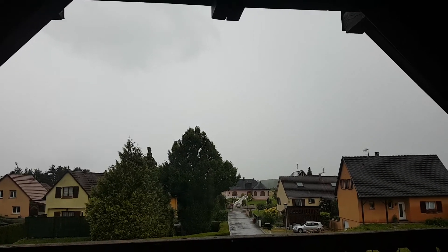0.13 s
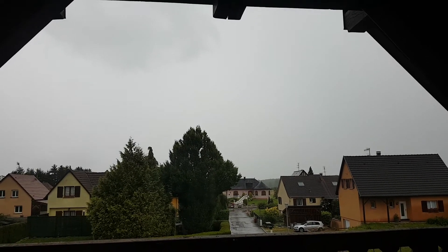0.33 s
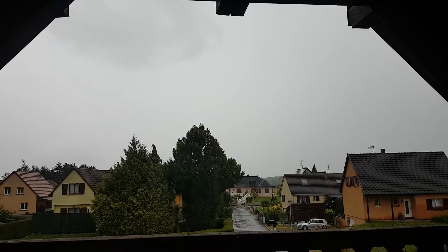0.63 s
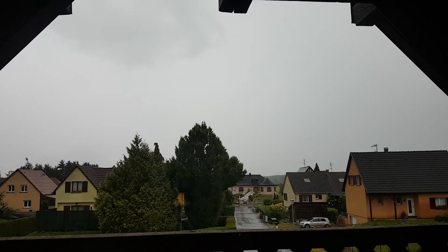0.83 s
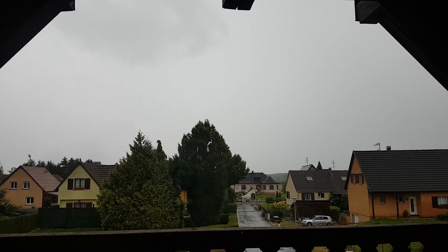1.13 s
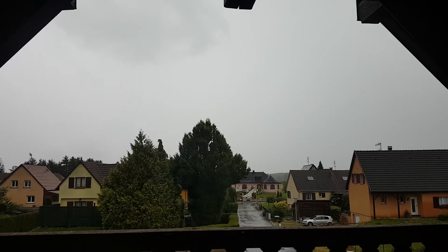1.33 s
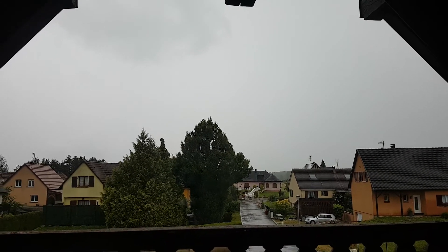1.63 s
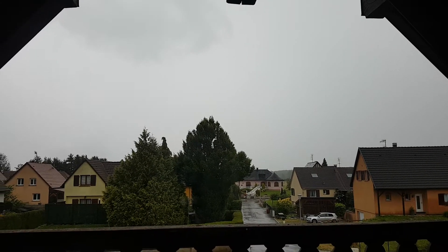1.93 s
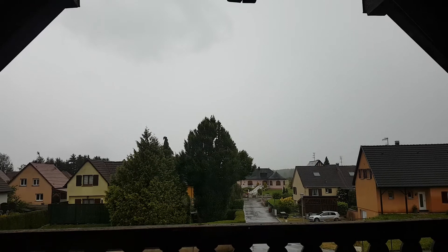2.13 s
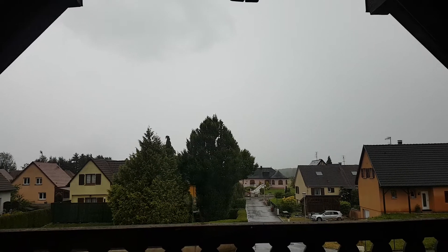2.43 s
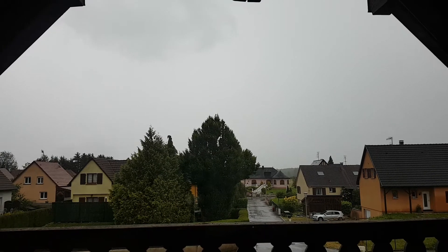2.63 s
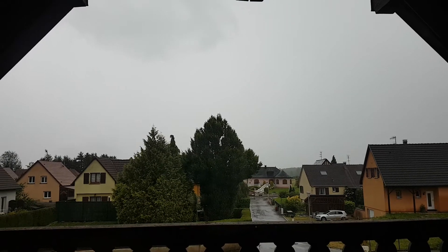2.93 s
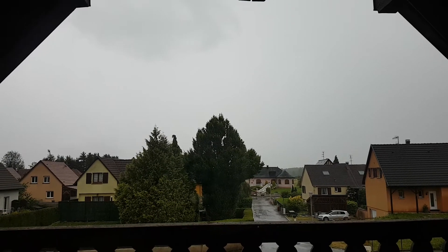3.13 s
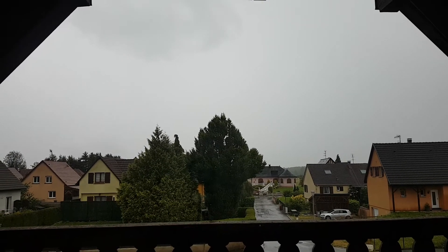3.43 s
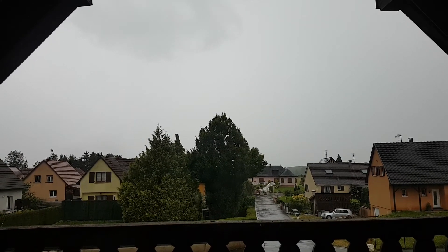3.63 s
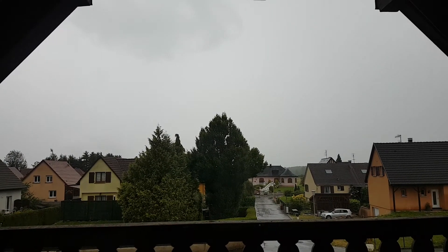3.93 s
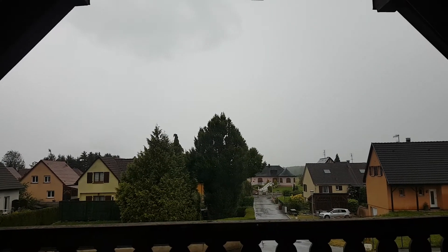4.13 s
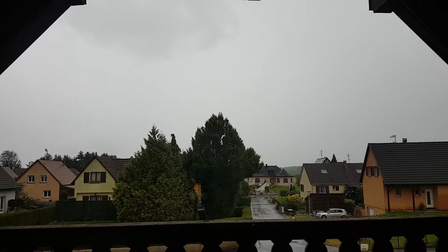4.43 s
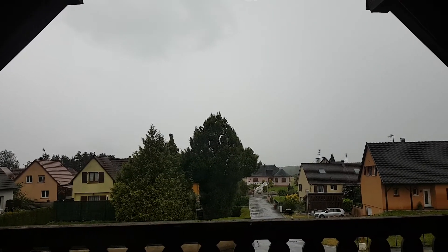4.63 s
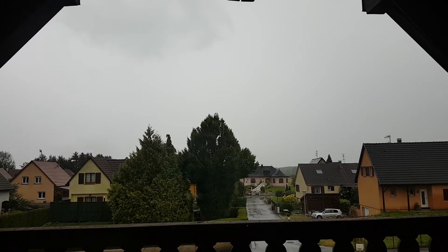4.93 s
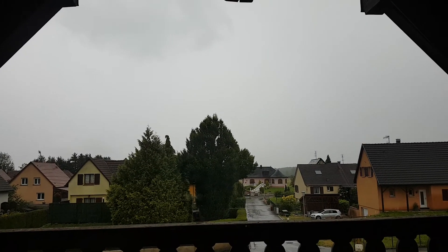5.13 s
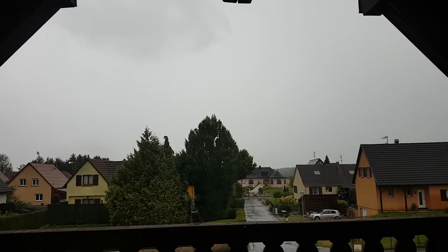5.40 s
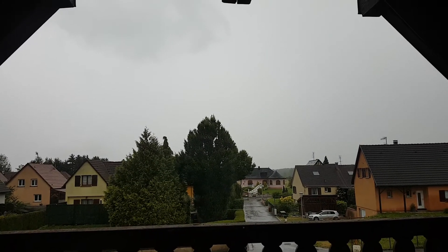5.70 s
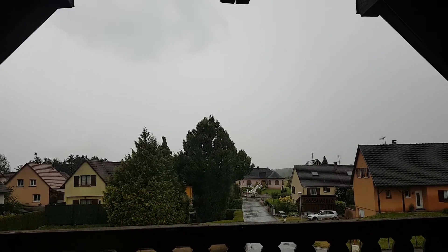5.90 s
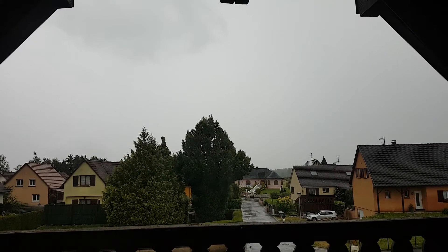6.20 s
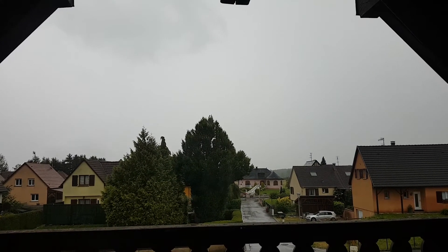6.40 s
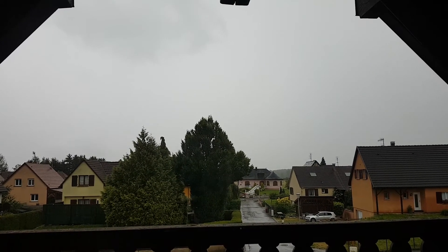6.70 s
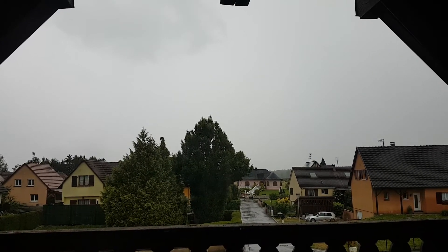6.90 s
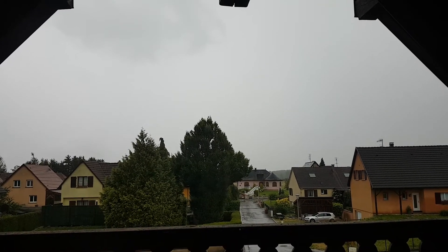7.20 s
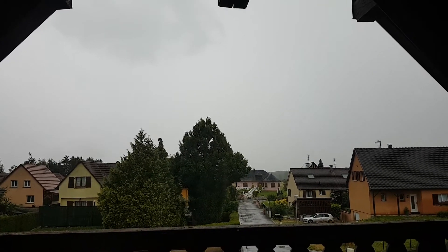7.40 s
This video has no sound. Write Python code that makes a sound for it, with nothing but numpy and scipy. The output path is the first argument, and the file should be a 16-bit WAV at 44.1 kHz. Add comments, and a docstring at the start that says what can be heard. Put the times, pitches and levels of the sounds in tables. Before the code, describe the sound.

Over a soft hiss of rain, nearby thunder tears open, booms in several waves and rolls away.

```python
"""Thunder from a near lightning strike, heard from a roofed wooden balcony above a village in light rain.
Shock waves from the kinks of the lightning channel arrive one after another: a tearing crackle,
heavy claps, then a dull roll that fades. The air dulls them and the balcony rings along.
Rain hisses far off, and two drops land on wood close by."""
import sys
import numpy as np
from scipy import signal
from scipy.fft import rfft, irfft, next_fast_len
from scipy.io import wavfile
from scipy.ndimage import uniform_filter1d

SR = 44100
rng = np.random.default_rng(int(sys.argv[2]) if len(sys.argv) > 2 else 0)


def store_pcm(level_fs):
    """Save levels as 16-bit WAV."""
    pcm = np.round(np.clip(level_fs, -1, 1) * 32767).astype(np.int16)
    wavfile.write(sys.argv[1], SR, np.atleast_2d(pcm).T)


N = 332999

# The tone of the rain. Each row: frequency in Hz, gain in dB.
RAIN_TONE = [(40, 2), (100, 1.5), (280, -3), (400, -3), (900, -7.5), (2000, -6.5), (3200, -14), (4700, -18),
             (5800, -22), (7400, -21), (8700, -29.5), (10500, -28.5), (12500, -25), (15500, -22)]
# How loud the rain is. Each row: time in seconds, level in dB.
RAIN_LEVELS = [(0, -63), (.7, -62), (1.5, -58), (2.1, -59.5), (3, -60.5), (4.5, -59.5), (6.2, -59.5),
               (6.52, -59), (6.7, -59.5), (7.55, -60)]
# Drops landing close by. Each row: start in seconds, peak in dB, brightness in dB per octave,
# pitch of the struck spot as a factor.
NEAR_DROPS = [(1.079, -28.5, 2.2, 1), (3.7664, -34.5, -2, .74)]
# The tone of a splat, before its pitch factor. Each row: frequency in Hz, gain in dB.
SPLAT_TONE = [(800, -30), (1900, -3), (2700, 3), (3400, -2.5), (4800, 0), (5900, -4.5), (6800, -19),
              (9000, -21), (10800, -9), (13500, -17), (15500, -15)]
# Where wood rings, before the pitch factor. Each row: frequency in Hz, width in Hz, gain in dB.
WOOD_RESONANCES = [(2860, 350, 8), (3950, 250, 4.5), (4800, 540, 8.5)]
# The tone of shocks after crossing the air. Each row: frequency in Hz, gain in dB.
AIR_TONE = [(25, -8.5), (45, -16), (120, -4.5), (400, -10), (700, -13), (1100, -19), (1500, -19),
            (2000, -36), (2600, -49), (3500, -73.5), (6000, -95)]
# Where the space under the roof rings. Each row: frequency in Hz, width in Hz, gain in dB.
BALCONY_RESONANCES = [(62.5, 2.7, 12), (72.5, 17, -5), (97.3, 28, 8), (116, 6.6, -7.5), (148.8, 37, 8),
                      (194, 12, 3.5), (220.4, 22, 7), (262.7, 10.7, 13), (289, 36, -8.5), (326, 42, 5.5),
                      (369.4, 23.5, 10), (408.4, 9.1, 7), (460.4, 15, 8.5), (500.3, 24, 3), (539, 24, 5.5),
                      (645.5, 37, 6), (695, 22, -2), (878.4, 36, 8), (998, 11, 6), (1166, 74, 1.5),
                      (1280, 21, 3), (1582, 70, 3), (1855, 31, 6.5), (2060, 48, 8.5), (2920, 490, 4.5)]
# How two microphone openings hear a sound. Each row: frequency in Hz, likeness (1 or more is alike),
# lead of the left side in radians, left level over right in dB.
MIC_PORTS = [(50, 1.05, 0.67, 0.5), (154, 1.02, 0.35, 0), (264, 0.87, 0.48, -2), (397, 0.88, -0.9, -2.5),
             (470, 0.94, 0, -1.5), (703, 0, -1.46, -4.5), (784, 0.99, -1.33, -6.5), (863, 0.7, -2.5, 4.5),
             (970, 0.64, -2.5, -3.5), (1520, 0.62, -3, 0), (1910, 0, -3.5, 2), (3130, 0, -6.5, -3.5),
             (15000, 0, -12, 0)]
# The roll under the claps, before each band's own gain. Each row: time in seconds, level in dB,
# extra bass in dB, extra crackle in dB.
ROLL_LEVELS = [(0,-76,4,3), (.62,-63,-7,-9), (.96,-45,-12.5,-8), (1.22,-48,-8,-10), (1.6,-42.5,-9.5,-8),
               (2.0,-35,-6.5,-13.5), (2.12,-28,-2.5,-13.5), (2.5,-34,5,-14.5), (2.81,-23.5,3.5,-16),
               (3.03,-30,1.5,-20), (3.58,-39,2,-22), (3.78,-35.5,-0.5,-18.5), (4.06,-35.5,.5,-27),
               (4.26,-27.5,3.5,-26.5), (4.65,-32.5,2,-24.5), (4.9,-29,2.5,-28.5), (5.64,-30,2.5,-24.5),
               (5.98,-37,4,-20.5), (6.22,-37.5,3,-20.5), (6.53,-45.5,4.5,-19), (6.83,-44.5,5.5,-16),
               (7.0,-52.5,6.5,-15), (7.55,-55,5.5,-17)]
# Sharp cracks, loudest on the nearest claps. Each row: start in seconds, level in dB,
# length in seconds, main pitch in Hz.
SHARP_CRACKS = [(0.474, -60, 0.02, 700), (0.701, -62, 0.05, 1200), (0.819, -54, 0.037, 1000),
                (0.917, -55, 0.079, 1020), (1.491, -53, 0.077, 1190), (1.787, -48.5, 0.076, 1210),
                (1.941, -50, 0.045, 1300), (2.053, -39.5, 0.043, 2200), (2.097, -38.5, 0.065, 1514),
                (2.24, -46, 0.18, 1480), (2.594, -34.5, .018, 3600), (2.597, -35.5, 0.046, 1674),
                (2.759, -40.5, 0.093, 1000), (5.647, -48.5, .04, 805), (6.5, -58, .06, 2300)]
# The tone all cracks share. Each row: frequency in Hz, gain in dB.
SHARP_TONE = [(300, -25), (900, 3.5), (2000, -2), (3000, -22.5), (4200, -38.5), (6000, -48.5),
              (9000, -59.5)]
# Heavy claps. Each row: start in seconds, level in dB, length in seconds, main pitch in Hz,
# focus on that pitch (1 is ragged, over 10 is round), extra level of its thump in dB.
HEAVY_CLAPS = [(1.75,-33,0.017,430,19,-33), (1.8,-34,0.031,419,23,-25), (1.846,-31,0.014,427,21,-25),
               (1.947,-29,0.029,456,27,-39.5), (2.044,-22.5,0.11,445,5,-9), (2.222,-31.5,0.11,490,5.4,-14),
               (2.342,-24,0.066,444,6.8,-16), (2.541,-26.5,0.049,500,4,-5.5),
               (2.592,-16,0.059,320,1.66,-14), (2.672,-21.5,0.021,230,8.2,-27), (2.725,-27,.05,200,6,-13.5),
               (2.78,-17.5,0.088,253,1.8,-3), (2.886,-19.5,0.02,250,0.92,-12),
               (2.968,-30.5,.036,275,2.7,-17), (3.096,-20,0.023,135,3.5,-11), (3.118,-21,0.06,331,4.7,-9),
               (3.25,-27.5,0.066,480,1.7,-6), (3.326,-25,0.099,307,0.87,-18),
               (3.898,-32.5,0.095,383,1.2,-1), (4.17,-27.5,0.13,340,3,-16), (4.25,-25,0.044,330,1.9,-19),
               (4.265,-29.5,0.15,197,34,-20), (4.41,-30.5,0.02,313,2.2,-10), (4.75,-30,.12,640,2.9,-12),
               (4.968,-27.5,0.028,217,4.2,-12), (5.061,-24.5,0.063,146,4.2,-1), (5.239,-34,0.075,195,3.3,8),
               (5.343,-29.5,0.037,410,2.1,-18), (5.464,-37.5,0.053,285,1.1,3),
               (5.542,-23.5,0.022,255,1.15,-6), (5.627,-18,0.037,153,4.8,-20), (5.657,-20,0.045,253,44,-25),
               (5.789,-27,0.034,200,2.7,-30), (5.871,-26,0.02,265,1.34,-11), (6.018,-32.5,0.1,324,3,-2.5),
               (6.137,-25.5,0.06,190,4.3,-16), (6.281,-39.5,0.08,380,3.6,-14)]


def gain_of(db):
    """Turns decibels into a factor."""
    return 10 ** (np.asarray(db) / 20)


def unit_level(x):
    """Scales a sound to an average power of 1."""
    return x / np.sqrt(np.mean(x ** 2) + 1e-20)


def at_hz(table, hz):
    """Looks up a table's columns at these frequencies."""
    row_hz, *columns = np.transpose(table)
    return np.squeeze([np.interp(np.log(hz + 1), np.log(row_hz + 1), c) for c in columns])


def over_time(table):
    """Draws straight lines between a table's rows, one value per sample."""
    times, *columns = np.transpose(table)
    return np.squeeze([np.interp(np.arange(N) / SR, times, c) for c in columns])


def add(mix, start_s, sound):
    """Mixes a sound in at its start time."""
    part = mix[:, round(start_s * SR):][:, :sound.shape[1]]
    part += sound[:, :part.shape[1]]


def colour(x, db_at, size=16384):
    """Shapes the tone by db_at(Hz); it rings only after each hit, never before."""
    hz = abs(np.fft.fftfreq(size, 1 / SR))
    log_gain = np.log(gain_of(np.maximum(db_at(hz), -120)))
    response = np.fft.ifft(np.exp(np.conj(signal.hilbert(log_gain)))).real[:size // 2]
    return signal.fftconvolve(x, response[None], axes=1)[:, :x.shape[1]]


def band(x, low_hz, high_hz):
    """Keeps what lies between two frequencies."""
    return signal.sosfiltfilt(signal.butter(3, [low_hz, high_hz], "band", fs=SR, output="sos"), x)


def swell(x, level_db, smooth_s=0.021):
    """Makes a sound follow a level curve, keeping its fast flutter."""
    span = int(smooth_s * SR)
    power = uniform_filter1d(uniform_filter1d((x ** 2).mean(0), span), span)
    return x * gain_of(level_db) / np.sqrt(abs(power) + 1e-20)


def resonances_db(table, hz):
    """Each resonance lifts or lowers the frequencies near its own."""
    return sum(db / (1 + (2 * (hz - centre) / width) ** 2) for centre, width, db in table)


def stereo(pair):
    """Turns two unrelated signals into what the left and right microphone openings hear."""
    size = next_fast_len(pair.shape[1] + 2048)
    shared, separate = rfft(pair, size)
    likeness, lead, balance_db = at_hz(MIC_PORTS, np.fft.rfftfreq(size, 1 / SR))
    likeness = np.clip(likeness, 0, 1)
    left = (likeness * shared + np.sqrt(1 - likeness ** 2) * separate) * np.exp(1j * lead)
    lean = gain_of(balance_db / 2)
    return irfft([left * lean, shared / lean], size)[:, :pair.shape[1]]


def shocks(count, per_s, spread_db):
    """Two streams of randomly timed pressure jumps; spread_db makes their sizes uneven."""
    height = gain_of(spread_db * np.minimum(rng.exponential(1, (2, count)), 3.5))
    return height * rng.choice([-1, 1], (2, count)) * (rng.random((2, count)) < per_s / SR)


def rain():
    """Far drops merge into a hiss; nearer ones patter faintly."""
    hiss = unit_level(rng.standard_normal((2, N)))
    patter = gain_of(-9) * unit_level(shocks(N, per_s=280, spread_db=0))
    drops = stereo(colour(hiss + patter, lambda hz: at_hz(RAIN_TONE, hz)))
    return gain_of(over_time(RAIN_LEVELS)) * unit_level(drops)


def drips(splat_fade_s=0.011, echo_db=-15, echo_fade_s=0.14):
    """A drop splats on the wood, which rings briefly; the roof gives a short echo."""
    out, t = np.zeros((2, N)), np.arange(SR // 4) / SR
    for start_s, peak_db, bright_db, pitch in NEAR_DROPS:
        splat, echo = rng.standard_normal((2, 2, len(t)))
        splat *= gain_of(-60 * t / splat_fade_s)
        echo = band(echo, 2400 * pitch, 6500 * pitch) * gain_of(echo_db - 60 * t / echo_fade_s)
        tick = colour(splat + echo, lambda hz: at_hz(SPLAT_TONE, hz / pitch)
                      + resonances_db(WOOD_RESONANCES, hz / pitch)
                      + bright_db * np.log2(1 + hz / 1000))
        add(out, start_s, gain_of(peak_db) * tick / abs(tick).max())
    return out


def path_db(hz):
    """Air takes away the treble; the balcony adds its ringing."""
    return at_hz(AIR_TONE, hz) + resonances_db(BALCONY_RESONANCES, hz)


def thumps_db(rise_s=0.034, linger_s=0.03):
    """Level curve of the deep thumps: each rises quickly and outlasts its clap a little."""
    power, age = np.zeros((1, N)), np.arange(SR // 2) / SR
    for start_s, level_db, length_s, _, _, thump_db in HEAVY_CLAPS:
        shape = np.minimum(age / rise_s, 1) * np.exp(-(age / (length_s + linger_s)) ** 4)
        add(power, start_s, (gain_of(level_db + thump_db) * shape[None]) ** 2)
    return 10 * np.log10(power[0] + 1e-20)


def roll():
    """A dense stream of shocks: short waves from near parts of the channel, long ones from afar."""
    level_db, bass_db, crackle_db = over_time(ROLL_LEVELS)
    depth_db = -16 + 0.9 * np.arange(N) / SR  # later sound comes from farther off, so it is deeper
    stream = stereo(colour(shocks(N, per_s=2400, spread_db=2), path_db))
    rumble = swell(band(stream, 25, 104), level_db + bass_db + depth_db, smooth_s=0.23)
    # The thumps sit on the balcony's lowest resonance.
    thumps = gain_of(-4) * swell(band(stream, 52, 74), thumps_db(), smooth_s=0.041)
    boom = gain_of(-4) * swell(band(stream, 116, 306), level_db + bass_db)
    body = gain_of(-1) * swell(band(stream, 321, 1133), level_db, smooth_s=0.067)
    crackle = gain_of(3.5) * swell(band(stream, 963, 6000), level_db + crackle_db)
    return rumble + thumps + boom + body + crackle


def hump_db(hz, centre_hz, focus=1):
    """A burst's tone is a hump: lower for longer waves, narrower for waves of like length."""
    ratio = (hz + 1) / centre_hz
    return focus * 20 * np.log10(2 * ratio / (1 + ratio ** 2))


def burst(start_s, level_db, length_s, db_at, per_s, rise_share, echo_db, echo_fade_s):
    """A tight bunch of shocks and their echoes off the houses; returns (start, sound)."""
    lead_s = 0.04
    t = np.arange(SR // 3) / SR - lead_s
    direct = np.exp(-(t / length_s) ** 4) * shocks(len(t), per_s, spread_db=1.5)
    echoes = gain_of(echo_db - 60 * abs(t) / echo_fade_s) * shocks(len(t), per_s=440, spread_db=-0.5)
    rise = np.sqrt(np.clip(t / (rise_share * length_s), 0, 1))
    sound = colour((direct + echoes) * rise, db_at)
    sound /= np.sqrt((sound ** 2).sum(1, keepdims=True) / (length_s * SR))
    soft_edges = signal.windows.tukey(len(t), lead_s)
    return start_s - lead_s, gain_of(level_db) * stereo(sound) * soft_edges


def cracks():
    """Fewer, brighter shocks are heard as tearing."""
    out = np.zeros((2, N))
    for start_s, level_db, length_s, pitch_hz in SHARP_CRACKS:
        tone_db = lambda hz: at_hz(SHARP_TONE, hz) + hump_db(hz, pitch_hz)
        add(out, *burst(start_s, level_db, length_s, tone_db,
                        per_s=700, rise_share=0.065, echo_db=-17, echo_fade_s=0.2))
    return out


def claps():
    """Where a stretch of the channel lies side-on, many shocks arrive at once."""
    out = np.zeros((2, N))
    for start_s, level_db, length_s, pitch_hz, focus, _ in HEAVY_CLAPS:
        tone_db = lambda hz: path_db(hz) + hump_db(hz, pitch_hz, focus)
        add(out, *burst(start_s, level_db, length_s, tone_db,
                        per_s=1900, rise_share=0.092, echo_db=-12, echo_fade_s=0.21))
    return out


def scene():
    """Thunder over the rain."""
    return roll() + claps() + cracks() + rain() + drips()


def record(dry):
    """Cuts the highest treble, above 15800 Hz."""
    low_pass = signal.firwin(511, 15800, window=("kaiser", 9), fs=SR)
    return signal.oaconvolve(dry, low_pass[None], "same")


dry = scene()
out = record(dry)
store_pcm(out)
```